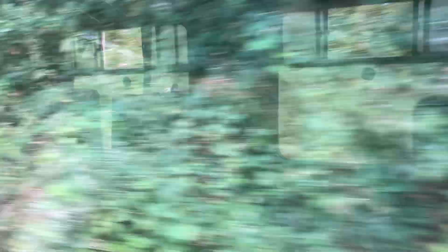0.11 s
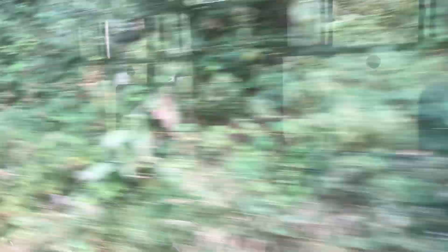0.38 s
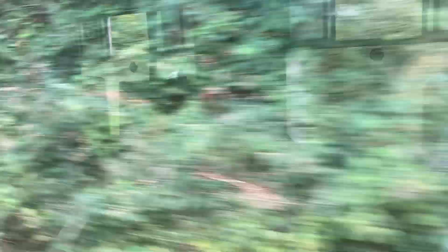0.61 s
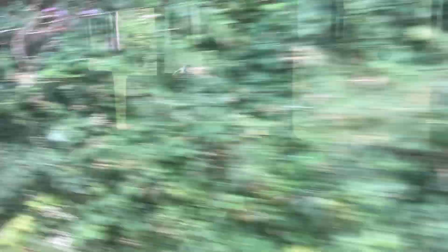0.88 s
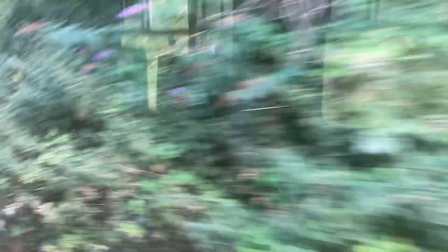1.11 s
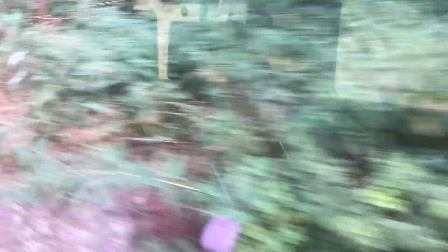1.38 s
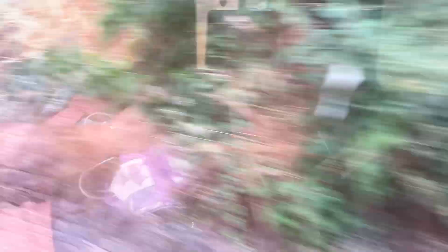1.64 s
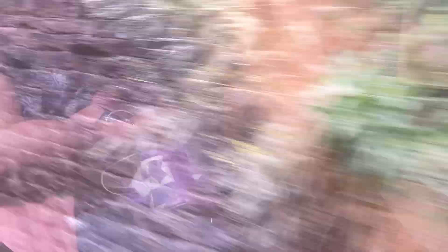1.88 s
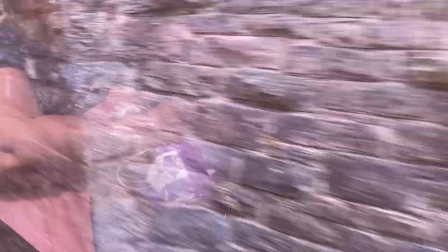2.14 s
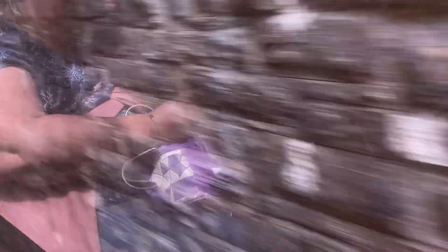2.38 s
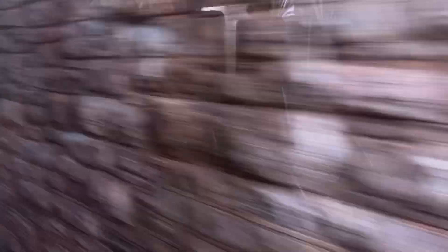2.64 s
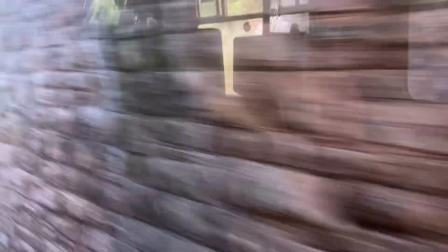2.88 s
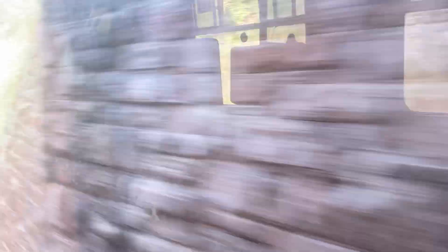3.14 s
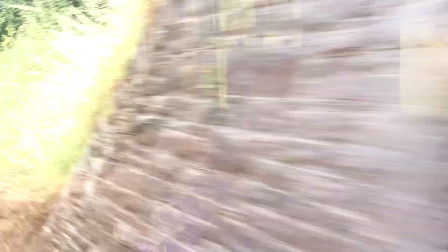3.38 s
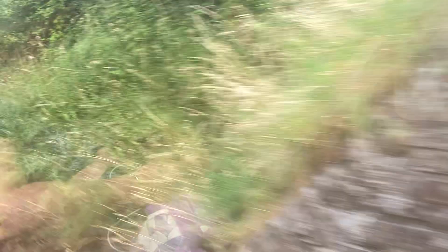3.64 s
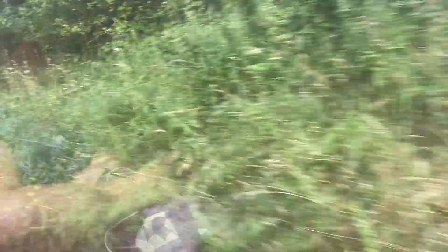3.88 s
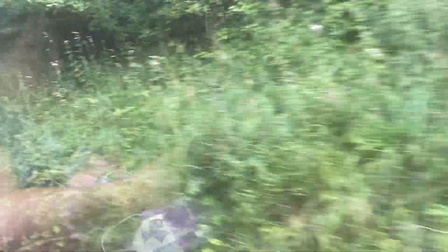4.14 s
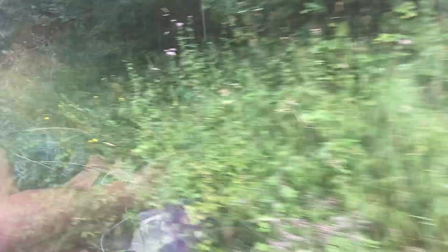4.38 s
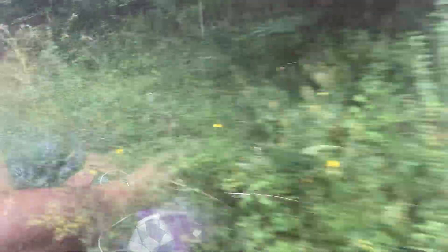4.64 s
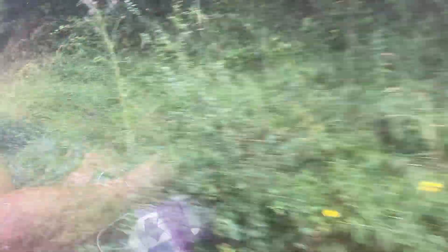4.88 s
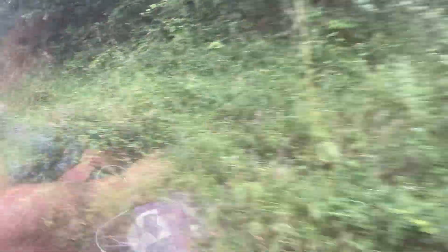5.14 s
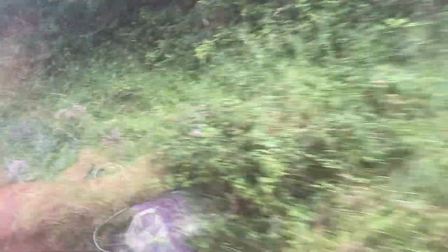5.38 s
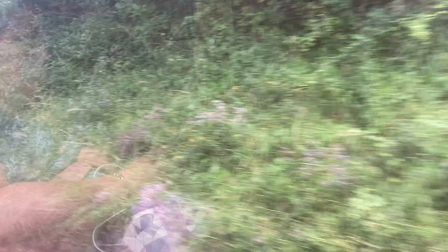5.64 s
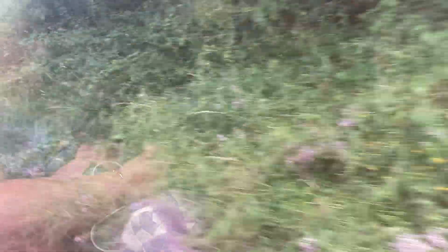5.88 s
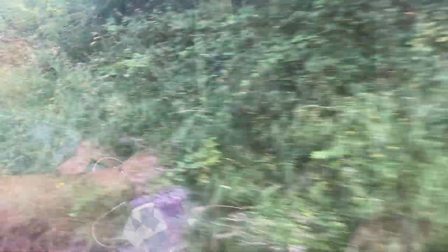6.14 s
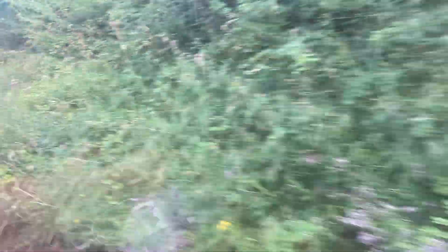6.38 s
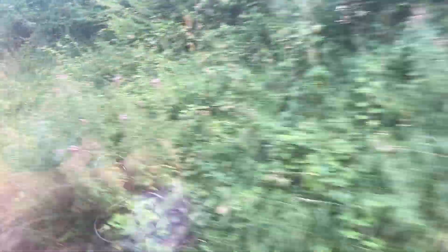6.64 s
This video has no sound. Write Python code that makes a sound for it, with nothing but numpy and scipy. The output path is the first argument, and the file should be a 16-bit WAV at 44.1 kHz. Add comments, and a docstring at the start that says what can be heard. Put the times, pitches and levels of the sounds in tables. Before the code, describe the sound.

Inside a passenger coach running at speed, a deep, heaving rumble dominates, with floor drumming, mid roar and faint gritty hiss for nearly seven seconds. A low knock and thin squeak come at 0.2, a tiny bright tick at 0.5, then joint clacks at 1.2, 1.4 and 1.8, and a heavy clatter at 2.05. From about 2.4 to 3.3 a close stone wall throws back a fuller roar; very high squeaks stand out near 2.45. Clatter returns at 3.05, and a cluster of hard steel blows hits around 3.3. The roar eases in the open, with knocks at 3.7 and 3.95. A calmer stretch from 4.1 to 4.9 has soft panel booms and faint squeaks. More knocks fall at 5.2, 5.6 and 5.9, with a strong bass heave near 5.9; then steady rumble to the end. Close stereo cabin perspective.

```python
"""Wheels rolling under a passenger coach: filtered noise makes a body rumble, floor drumming, roar and hiss,
driven by tables of track roughness and lineside; the roar swells beside a stone wall.
The wheels knock over rail joints as noise bursts, ringing modes and decaying sines; panels boom as
resonated noise, a fitting squeaks near 7 kHz as a wavering sine, and something small ticks as bright noise.
Two microphone ports hear nearly the same bass, mostly unrelated middles and a treble shifted in phase."""
import sys
import numpy as np
from scipy import signal
from scipy.fft import rfft, irfft, next_fast_len
from scipy.io import wavfile
from scipy.ndimage import uniform_filter1d

SR = 44100
rng = np.random.default_rng(int(sys.argv[2]) if len(sys.argv) > 2 else 0)


def materialize(psi):
    """Save the field psi as 16-bit PCM at rate SR to the path in sys.argv[1].

    A 1-D psi becomes a single channel; in a 2-D psi each row is a channel.
    """
    bounded = np.clip(np.atleast_2d(psi).T, -1, 1)
    quanta = np.round(bounded * 32767).astype(np.int16)
    wavfile.write(sys.argv[1], SR, quanta)


def natural_amplitude(level_db):
    """Convert a level in decibels to a linear amplitude factor, elementwise."""
    exponent = np.asarray(level_db, float) / 20
    return 10 ** exponent


N = 298116
LEAD_IN = 4096  # samples rendered ahead of time zero
SIZE = next_fast_len(N + 2 * LEAD_IN)
HZ = np.fft.rfftfreq(SIZE, 1 / SR)
T = (np.arange(SIZE) - LEAD_IN) / SR


def on_hz(table):
    """A (f/Hz, value) table read at every frequency bin, on a log frequency axis."""
    hz, value = np.transpose(table)
    return np.interp(np.log(HZ + 1), np.log(hz), value)


def band(lo_hz, hi_hz, order=3):
    """Gain of a smooth band-pass."""
    low_side = 1 + (lo_hz / (HZ + 1e-3)) ** (2 * order)
    high_side = 1 + (HZ / hi_hz) ** (2 * order)
    return 1 / np.sqrt(low_side * high_side)


def shape(x, gain):
    """Filter by a gain per frequency bin."""
    return irfft(rfft(x) * gain, SIZE)


def unit(x):
    """Scale to rms 1."""
    return x / np.sqrt(np.mean(x ** 2))


def walk(rate):
    """Random levels held 1 / rate s and slewed twice; spread near 1."""
    k = int(SR / rate)
    steps = np.repeat(rng.standard_normal(SIZE // k + 1), k)
    return 1.34 * uniform_filter1d(uniform_filter1d(steps, k), k)[:SIZE]


def shaking(grit):
    """Three unrelated noises (common, left only, right only); grit adds sparse rattling grains."""
    noise = rng.standard_normal((3, SIZE))
    return noise * (1 + grit * rng.exponential(size=(3, SIZE)) ** 2)


def even(x, span_s, share):
    """Level out part of the beating of a narrow noise."""
    return x / uniform_filter1d(x ** 2, int(span_s * SR)) ** (share / 2)


def patchy(x, patchy_db, patch_hz, patch_s, size=1024):
    """Let small patches of pitch and time swell and sink at random."""
    spec = signal.stft(x, nperseg=size)[2]
    field = rng.standard_normal(spec.shape[1:])
    for axis, cells in enumerate([patch_hz * size / SR, 2 * patch_s * SR / size]):
        for _ in range(2):
            field = uniform_filter1d(field, max(int(round(cells)), 1), axis=axis)
    return signal.istft(spec * natural_amplitude(patchy_db * unit(field)), nperseg=size)[1][:, :SIZE]


# resonances of the coach panels: (f/Hz, width/Hz, level/dB above the plain colour)
PANEL_MODES = [(43.7, 8.4, 4), (64.6, 20, 7), (104.5, 17, -2.5), (147.2, 31, 7), (203.3, 22.6, 5.5),
               (279.2, 25.6, 7.5), (719, 68, 3.5), (1303, 210, 4.5), (1715, 38, 3), (2730, 30, 3.5),
               (3170, 31, 6.5), (3600, 45, 4), (3840, 30, 7.5), (4191, 22, 6), (4680, 30, 7), (5010, 42, 6)]


def panels():
    """Resonant bumps of floor, walls and glass."""
    return natural_amplitude(sum(db / (1 + (2 * (HZ - hz) / width) ** 2) for hz, width, db in PANEL_MODES))


# steady colour of the cabin, relative: (f/Hz, level/dB)
CABIN_COLOUR = [(12, -50), (22, -9), (40, -8), (90, -3), (170, -14), (300, -16.5), (700, -22.5), (800, -30),
                (1590, -37), (3500, -55), (6000, -65.5), (8500, -67), (11000, -70.5), (14500, -83),
                (16000, -86)]


def cabin_noise(grit, lo_hz, hi_hz):
    """Shaking noise with one range of the cabin colour and its panel resonances."""
    return shape(shaking(grit), natural_amplitude(on_hz(CABIN_COLOUR)) * panels() * band(lo_hz, hi_hz))


# the ride: (t/s, track roughness level/dB, rolling noise thrown back from the lineside level/dB)
RIDE_LEVELS = [(0, 1.5, 2.5), (.5, -1.5, 0), (1.0, -1, 2.5), (1.25, -0.5, 5), (1.7, 4.5, 0), (2.0, 2.5, 5),
               (2.2, 4, 1.5), (2.38, 3.5, 5), (2.6, 2, 8.5), (3.0, 1.5, 8.5), (3.2, 0.5, 10), (3.4, 0, 4),
               (3.9, 3, 2.5), (4.25, 0.5, 0.5), (4.8, 0, 0.5), (5.2, 3, 0), (5.699, 1.5, 1),
               (6.0, -0.5, -1), (6.4, 1, -1.5), (6.76, 0, -2)]


def track_and_wall():
    """Track roughness and lineside return in dB, gliding between the points of the ride."""
    s, track, wall = np.transpose(RIDE_LEVELS)
    return np.interp(T, s, track), np.interp(T, s, wall)


# the coach body heaves on its springs: (t/s, level/dB, half width/s, 0.01 s at least)
BODY_HEAVES = [(0.016, -20.5, 0.031), (0.414, -19, 0.02), (.55, -23.5, 0.068), (.74, -28, 0.13),
               (1.15, -21, 0.094), (1.45, -25, 0.095), (1.95, -18.5, 0.042), (2.191, -17, 0.051),
               (2.53, -14, 0.043), (2.93, -18.5, 0.02), (3.21, -22.5, 0.16), (3.42, -28, .04),
               (3.6, -20, 0.074), (3.9, -21, 0.18), (4.15, -25.5, 0.22), (4.48, -22.5, 0.13),
               (4.77, -22.5, 0.052), (5.03, -19, 0.029), (5.26, -21.5, 0.038), (5.5, -24, 0.03),
               (5.75, -19.5, 0.028), (5.93, -13, 0.033), (6.04, -16, 0.058), (6.16, -19.5, 0.049),
               (6.36, -24.5, 0.044), (6.55, -20.5, 0.015)]


def heaving():
    """Power of the body's heaves on its springs, each a bell in time."""
    return sum(natural_amplitude(2 * db) * np.exp(-((T - at) / max(width, .01)) ** 2) for at, db, width in BODY_HEAVES)


def body_rumble(track, heave, deep_db=-25.5):
    """The coach body rumbles with track roughness and swells as it heaves."""
    deep = unit(even(cabin_noise(0, 10, 135.0), 0.052, 0.53))
    return deep * np.sqrt(natural_amplitude(2 * (deep_db + track)) + heave)


def floor_drumming(track, wall, heave, floor_db=-30, heave_db=-15, wall_share=0.072):
    """The floor drums with the track, takes a little of each heave and flickers slowly."""
    power = natural_amplitude(2 * (floor_db + track + wall_share * wall)) + natural_amplitude(2 * heave_db) * heave
    floor = unit(even(cabin_noise(0, 143, 329), 0.054, 0.57))
    return floor * np.sqrt(power) * natural_amplitude(1.16 * walk(16))


# tones of the rails: (f/Hz, width/Hz, level/dB)
RAIL_TONES = [(735, 58, 6), (1330, 240, -3.5)]


def wheel_roar(wall, roar_db=-35.5, rail_db=-56.5, rail_wall=1.7):
    """Wheels roar on the rails and the lineside returns it; two rail tones sing out beside a wall."""
    roar = unit(cabin_noise(0.1, 320, 1240)) * natural_amplitude(roar_db + wall + 1.0 * walk(20))
    tones = sum(natural_amplitude(db) / (1 + (2 * (HZ - hz) / width) ** 4) for hz, width, db in RAIL_TONES)
    return roar + unit(shape(shaking(0.1), tones)) * natural_amplitude(rail_db + rail_wall * wall)


def rolling_hiss(track, wall, hiss_db=-50.5, track_share=0.98, wall_share=0.62, top_wall=0.11):
    """Gritty treble of rolling; its top flickers on its own and gains most from a wall."""
    grit = unit(cabin_noise(0.094, 2267, 19000)) * natural_amplitude(hiss_db + track_share * track + wall_share * wall)
    top = shape(grit, band(2200, 19000, order=2))
    return (grit - top) * natural_amplitude(1.3 * walk(37)) + top * natural_amplitude(top_wall * wall + 1.4 * walk(30))


def air_hiss(air_db=-68):
    """A faint, even air hiss under the treble."""
    return unit(cabin_noise(0, 4900, 19000)) * natural_amplitude(air_db)


def rolling():
    """Rough wheels shake the coach: rumble, then drumming, roar and hiss in shifting patches, over air."""
    track, wall = track_and_wall()
    heave = heaving()
    upper = floor_drumming(track, wall, heave) + wheel_roar(wall) + rolling_hiss(track, wall)
    return body_rumble(track, heave) + patchy(upper, 2.0, 50, .05) + air_hiss()


# wheel over a joint, played by joints() and knocks():
# (t/s, clatter level/dB, weight on the floor level/dB, hold/s, brightness/dB per octave)
RAIL_JOINTS = [(0.16, -45.5, -29.5, 0.028, 2.5), (0.977, -60, -46, 0.061, 10),
               (1.159, -35.5, -32, 0.027, -1), (1.419, -32.5, -28.5, 0.026, -2.5),
               (1.79, -29.5, -25, 0.036, -1.5), (2.055, -24, -19.5, 0.013, -2.5),
               (3.038, -29, -31, 0.042, -2.5), (3.2702, -25, -23.5, 0.063, 0), (3.55, -36, -36, 0.04, -2.5),
               (3.686, -30.5, -26.5, 0.033, -4), (3.945, -33, -23.5, 0.055, -2),
               (4.956, -40, -33.5, 0.066, 0), (5.222, -36, -26.5, 0.053, 1),
               (5.613, -32.5, -26, 0.035, 1.5), (5.879, -29, -26.5, 0.033, 0),
               (6.107, -46.5, -65, 0.022, 0.5)]
# colour of a knock, relative: (f/Hz, level/dB)
KNOCK_COLOUR = [(150, -5), (300, -2), (709, -10), (879, -16), (2800, -20), (5330, -33), (7290, -32),
                (10800, -35), (15600, -49.5)]
# ringing modes of the wheel: (f/Hz, level/dB)
WHEEL_MODES = [(1330, -17), (2870, -33), (3970, -10)]
# modes of the thumped floor: (f/Hz, level/dB)
THUMP_MODES = [(145, -1.5), (205, -6.5), (275, -18)]


def joints(fade_s=0.034, tail_s=0.22, tail_db=-14, thump_s=0.011, thump_db=12, lag=1.19,
           crack_db=-4, crack_s=0.0055, rattle_db=0.0, ring_db=-9, strike_db=3):
    """Each joint: a clatter that builds, rattles unevenly and dies, the wheel ringing through it, a floor thump."""
    # a longer contact builds more slowly and thumps less
    rise_s, rise_per_hold, sharp_hold_s = 0.002, 0.12, 0.045
    clatter = shape(shaking(0.023), natural_amplitude(on_hz(KNOCK_COLOUR)) * panels())
    clatter = patchy(clatter, 1.75, 250, 0.011, size=256)
    edges_hz = [200, 1000, 2200, 4500, 9000, 19000]
    parts = [shape(clatter, band(lo, hi)) * natural_amplitude(rattle_db * walk(160))
             for lo, hi in zip(edges_hz, edges_hz[1:])]
    peak = 2 * np.std(parts[1] + parts[2])
    rings = [unit(signal.lfilter(*signal.iirpeak(hz, 9, fs=SR), clatter)) for hz, db in WHEEL_MODES]
    # every mode is struck a little harder or softer each time
    strikes = strike_db * rng.standard_normal((len(RAIL_JOINTS), len(WHEEL_MODES) + len(THUMP_MODES)))
    out = np.zeros((3, SIZE))
    for (s, db, weight_db, hold, tilt_db), strike in zip(RAIL_JOINTS, strikes):
        span = slice(*np.searchsorted(T, [s, s + .6]))
        t = T[span] - s
        rise = max(rise_s + rise_per_hold * hold, .001)
        held = np.exp(-np.maximum(t - hold, 0) / fade_s)
        fall = held + natural_amplitude(tail_db) * np.exp(-t / tail_s)
        for octave, part in zip(range(-2, 3), parts):
            # each range builds at its own pace; the lowest follows the weight on the floor
            build = (1 - np.exp(-t / (rise * lag ** -octave))) ** 2
            part_db = weight_db if octave == -2 else db + tilt_db * octave
            out[:, span] += natural_amplitude(part_db) * build * fall * part[:, span] / peak
        # the first touch of the rail end cracks in the treble
        crack = np.exp(-t / crack_s) * (parts[3] + parts[4])[:, span] / peak
        out[:, span] += natural_amplitude(db + crack_db + 2 * tilt_db) * crack
        for (hz, mode_db), ring, luck_db in zip(WHEEL_MODES, rings, strike):
            mode_db += tilt_db * np.log2(hz / WHEEL_MODES[0][0]) + luck_db
            swell = (1 - np.exp(-t / rise)) * held
            out[:, span] += natural_amplitude(db + ring_db + mode_db) * swell * ring[:, span] / 2
        thump = sum(natural_amplitude(mode_db + luck_db) * np.sin(2 * np.pi * hz * t)
                    for (hz, mode_db), luck_db in zip(THUMP_MODES, strike[len(WHEEL_MODES):]))
        blunt = 1 + (hold / sharp_hold_s) ** 2
        push = (t / thump_s) * np.exp(1 - t / thump_s)
        out[0, span] += natural_amplitude(weight_db + thump_db) / blunt * push * thump
    return out


def knocks(knock_db=-4, ring_s=0.0039, spread_db=3, late_db=-12, low_hz=350, octaves=3, count=24):
    """Loose metal and wood parts knock one by one while the wheel crosses a joint, each on its own pitch."""
    chance = rng.random((len(RAIL_JOINTS), count, 6))
    t = np.arange(2048) / SR
    bump = t / ring_s * np.exp(1 - t / ring_s)
    out = np.zeros((3, SIZE))
    for (s, db, weight_db, hold, tilt_db), parts in zip(RAIL_JOINTS, chance):
        for late, pitch, size, *turn in parts:
            start = np.searchsorted(T, s + 0.002945 + late ** 2 * (hold + .03))
            level_db = db + knock_db + (tilt_db - 3.0) * (octaves * pitch - 1)
            level_db += spread_db * size + late_db * late ** 2
            # a starting phase of its own in each of the three signals
            cycle = low_hz * 2 ** (octaves * pitch) * t + np.array(turn)[:, None]
            out[:, start:start + len(t)] += natural_amplitude(level_db) * bump * np.sin(2 * np.pi * cycle)
    return out


# single hard blows inside a joint: (t/s, knock f/Hz, level/dB, hardness level/dB)
HARD_BLOWS = [(.168, 250, -16, -16), (1.162, 208, -20.5, -3), (1.795, 187, -9, -16), (2.069, 222, -13, -3),
              (3.287, 295, -22, 8), (3.321, 202, -13, 3), (3.342, 148, -17, 4), (3.357, 194, -15, -3),
              (3.696, 268, -16, -4), (3.965, 149, -18, -13), (5.229, 201, -16, -14),
              (5.631, 300, -16.5, -10), (5.886, 246, -23, -6)]


def blows(push_s=0.004, crack_db=-14, crack_s=0.0022):
    """A hard blow under the floor: one short low knock with a sharp crack of steel on its front."""
    steel = unit(shape(shaking(0.072), band(900, 3900, order=3)))
    out = np.zeros((3, SIZE))
    for s, hz, db, hard_db in HARD_BLOWS:
        span = slice(*np.searchsorted(T, [s, s + .08]))
        t = T[span] - s
        push = t / push_s * np.exp(1 - t / push_s)
        crack = t / crack_s * np.exp(1 - t / crack_s)
        out[0, span] += natural_amplitude(db) * push * np.sin(2 * np.pi * hz * t)
        out[:, span] += natural_amplitude(db + crack_db + hard_db) * crack * steel[:, span]
    return out


# a wheel that rings out clearly on one mode: (t/s, f/Hz, level/dB)
WHEEL_CLANGS = [(1.161, 3800, -37), (3.695, 1350, -32.5), (5.886, 2900, -44)]


def clangs(rise_s=0.0071, fade_s=0.051, sharpness=7):
    """One wheel mode driven by rattling noise, swelling quickly and dying away."""
    rattle, out = shaking(0.05), np.zeros((3, SIZE))
    for s, hz, db in WHEEL_CLANGS:
        span = slice(*np.searchsorted(T, [s, s + .3]))
        t = T[span] - s
        ring = unit(signal.lfilter(*signal.iirpeak(hz, sharpness, fs=SR), rattle[:, span]))
        out[:, span] += natural_amplitude(db) * (1 - np.exp(-t / rise_s)) * np.exp(-t / fade_s) * ring
    return out


# a panel booms up for a moment: (t/s, f/Hz, level/dB, half width/s, 0.01 s at least)
PANEL_BOOMS = [(.19, 267, -25, 0.016), (.71, 145.8, -27.5, 0.038), (1.17, 203, -25.5, 0.015),
               (1.432, 202, -21.5, 0.026), (1.50, 277, -27.5, 0.027), (1.86, 318, -31, 0.011),
               (1.816, 710, -28.5, 0.023), (2.43, 291, -29.5, 0.031), (2.497, 724, -32.5, 0.089),
               (2.706, 284, -24, 0.037), (3.07, 703, -31, 0.062), (3.246, 141.5, -27, 0.026),
               (3.338, 430, -33, 0.019), (3.803, 142, -24.5, 0.011), (4.108, 139.4, -27.5, 0.02),
               (4.181, 273, -32, 0.027), (4.558, 143.7, -25, 0.025), (4.675, 282, -29, .05),
               (5.264, 416, -33, .03), (5.282, 147, -26, 0.019), (5.65, 197, -27.5, 0.025),
               (6.008, 271, -30.5, 0.025), (6.292, 292, -34.5, 0.041), (6.332, 147, -31, 0.021),
               (6.72, 138.5, -24.5, 0.022)]


def booms(sharpness=8, steady=0.34):
    """One panel mode shaken up briefly: noise through a resonance, under a bell in time."""
    shake, out = shaking(0), np.zeros((3, SIZE))
    for s, hz, db, width in PANEL_BOOMS:
        span = slice(*np.searchsorted(T, [s - .3, s + .3]))
        ring = shake[:, span]
        for _ in range(2):
            ring = signal.lfilter(*signal.iirpeak(hz, sharpness, fs=SR), ring)
        bell = np.exp(-((T[span] - s) / max(width, .01)) ** 2 / 2)
        out[:, span] += natural_amplitude(db) * bell * unit(even(ring + 1e-9, 0.021, 2 * steady))
    return out


# squeaks of a fitting: (t/s, length/s, f/Hz at the start, glide/Hz per s, level/dB)
FITTING_SQUEAKS = [(.15, 0.075, 7110, 300, -50.5), (0.227, .045, 7160, 1001, -60),
                   (1.535, 0.042, 7160, 2003, -49.5), (2.235, .012, 7040, 2, -56),
                   (2.43, 0.016, 7100, 4, -42.5), (2.468, 0.018, 7070, 0, -39.5),
                   (2.495, 0.057, 7100, 0, -43), (2.575, 0.13, 7090, 302, -63),
                   (4.275, 0.17, 7150, -1, -54), (4.445, 0.055, 7180, 2000, -65), (4.58, .05, 7470, 0, -63),
                   (4.635, 0.15, 7230, 903, -55.5), (4.8, 0.034, 7260, -1000, -52),
                   (4.835, 0.062, 7200, 3, -56), (5.03, 0.06, 7080, 2, -51), (5.085, 0.063, 7070, 0, -61.5),
                   (5.865, 0.089, 7070, 495, -51.5), (6.155, 0.082, 7050, 511, -54)]


def squeak(waver_hz=26, throb_db=0.5, overtone_db=-11, ragged=0.49):
    """Stick-slip whistle of a rubbing fitting: a ragged, wavering line that throbs, with a weak overtone."""
    attack_s, sag_db_per_s, release_s = 0.0068, 35, 0.018
    hz, gain = np.full(SIZE, 7100.), np.zeros(SIZE)
    for s, length, pitch_hz, glide, db in FITTING_SQUEAKS:
        on = (T >= s) & (T < s + length + 5 * release_s)
        t = T[on] - s
        hz[on] = pitch_hz + glide * t
        attack = np.minimum(t / attack_s, 1) ** 2
        release = np.exp(-np.maximum(t - length, 0) / release_s)
        gain[on] = natural_amplitude(db - sag_db_per_s * t) * attack * release
    gain = np.sqrt(2) * uniform_filter1d(gain, int(0.018 * SR))
    gain = gain * natural_amplitude(throb_db * walk(45)) * (1 + ragged * walk(350))
    phase = 2 * np.pi * np.cumsum(hz + waver_hz * (walk(130) + 1.2 * walk(30))) / SR
    # the overtone wavers on its own and smears
    overtone = np.sin(2 * phase + 1.5 * walk(300))
    return gain * (np.sin(phase) + natural_amplitude(overtone_db) * overtone) * np.ones((3, 1))


# small bright ticks: (t/s, level/dB, lowest ring level/dB)
SMALL_TICKS = [(0.4549, -45, -10), (0.493, -29, 1.5), (3.522, -42, -2), (4.531, -40, -12)]
# what a tick rings with, lowest first: (f/Hz, width/Hz, level/dB)
TICK_MODES = [(8160, 1300, 7.5), (11300, 4000, 2.5), (15000, 1500, -8)]


def ticks(snap_s=0.0018, ring_s=0.036, ring_db=-24):
    """Tiny hard ticks, treble only, with a short cabin ring; thin ones wake the lowest ring less."""
    full, thin = np.zeros((2, SIZE))
    for s, db, low_db in SMALL_TICKS:
        t = np.maximum(T - s, 0)
        shell = (T >= s) * natural_amplitude(db) * (np.exp(-t / snap_s) + natural_amplitude(ring_db) * np.exp(-t / ring_s))
        full, thin = full + natural_amplitude(low_db) * shell, thin + shell
    low, *upper = (natural_amplitude(db) / (1 + (2 * (HZ - hz) / width) ** 4) for hz, width, db in TICK_MODES)
    noise = rng.standard_normal((3, SIZE))
    return shape(noise * full, low) + shape(noise * thin, sum(upper))


# share of power common to both ports: (f/Hz, share 0-1)
COMMON_SHARE = [(60, 0.98), (130, 0.99), (290, 1), (640, 0.62), (1400, 0.18), (3000, 0.3), (5000, 0),
                (7000, 1), (15000, 1)]
# balance of the ports: (f/Hz, left minus right level/dB)
LEFT_TILT = [(60, -3.5), (110, -4), (200, -3.5), (380, -3.5), (700, 1), (1290, 1), (2380, -1), (4400, 0.0),
             (8120, -1), (15000, 1)]
# the phase runs ahead through the middles and falls back through the treble: (f/Hz, left lead/rad)
LEFT_PHASE = [(0, 0), (300, .6), (1100, 1.4), (3000, 8.1), (5500, 15.2), (6900, 12.55), (16100, 0)]


def ports(three):
    """Mix a common and two private signals into left and right, band by band."""
    alike = np.clip(on_hz(COMMON_SHARE), 0, 1)
    common, left, right = rfft(three)
    lead = np.exp(1j * np.interp(HZ, *np.transpose(LEFT_PHASE)))
    tilt = natural_amplitude(on_hz(LEFT_TILT) / 2)
    left = tilt * (np.sqrt(alike) * lead * common + np.sqrt(1 - alike) * left)
    right = (np.sqrt(alike) * common + np.sqrt(1 - alike) * right) / tilt
    return irfft(np.array([left, right]), SIZE)


def scene():
    """Everything reaches the two ports through the cabin air; the end fades over a few milliseconds."""
    wheels = rolling() + joints() + knocks() + blows() + clangs()
    fittings = booms() + squeak() + ticks()
    fade = np.minimum((N - np.arange(N)) / 200, 1)
    return ports(wheels + fittings)[:, LEAD_IN:LEAD_IN + N] * fade


def band_limit(x):
    """A steep low-pass at the top of the band."""
    return signal.sosfilt(signal.butter(12, 16760, fs=SR, output="sos"), x)


def record(dry):
    """The loudest peaks are slightly rounded and the top is cut above 15.8 kHz."""
    rounded = np.tanh(0.62 * dry) / 0.58
    top_cut = signal.ellip(8, .2, 60, 15800, fs=SR, output="sos")
    mix = signal.sosfilt(top_cut, rounded)
    return band_limit(mix)


dry = scene()
out = record(dry)
materialize(out)
```